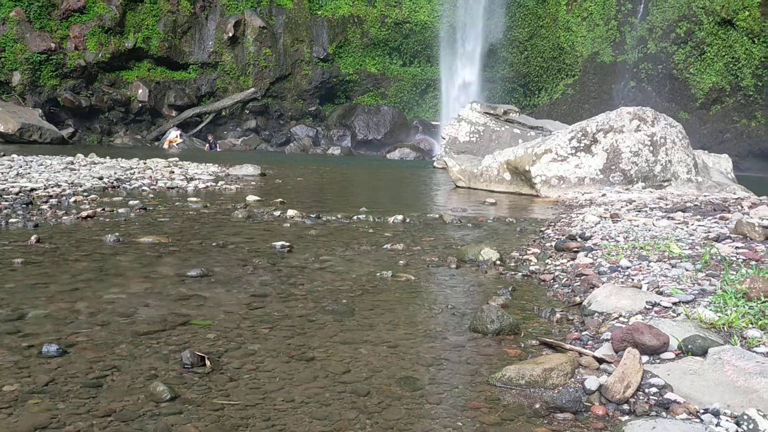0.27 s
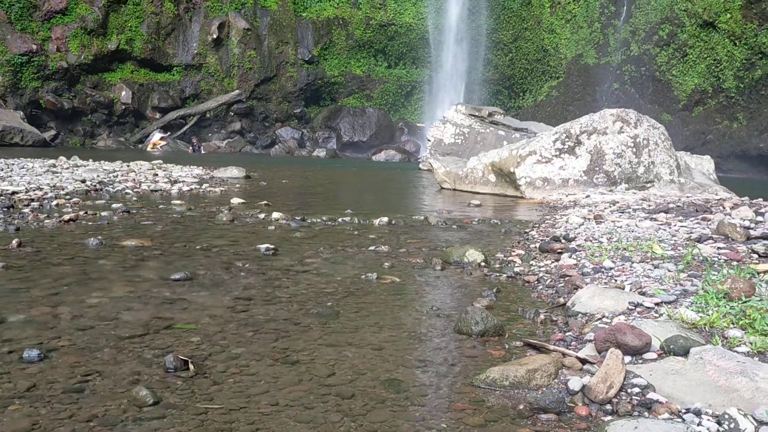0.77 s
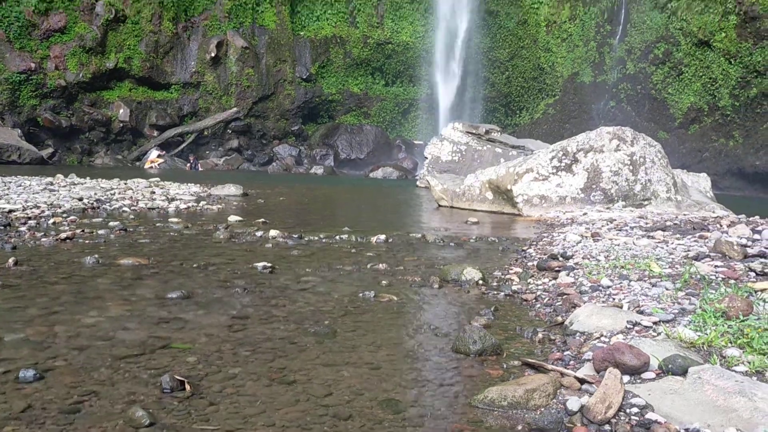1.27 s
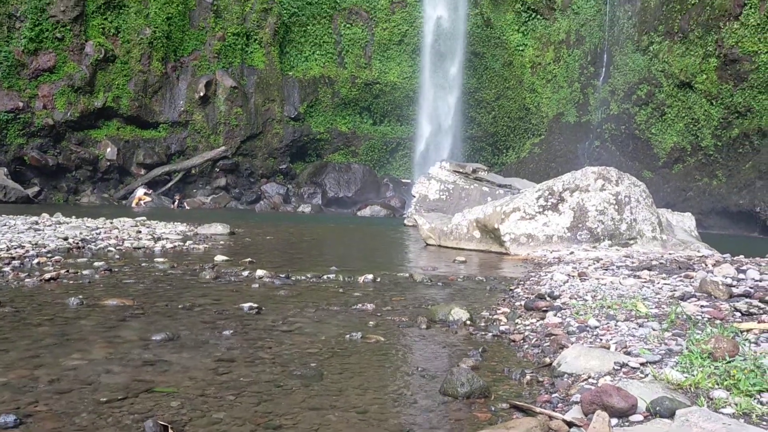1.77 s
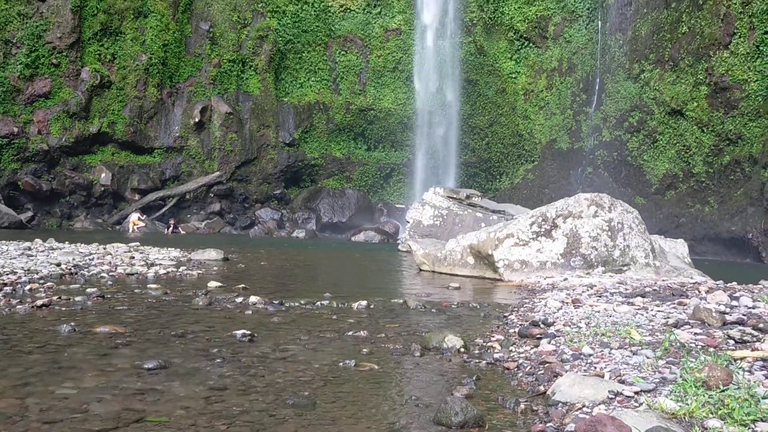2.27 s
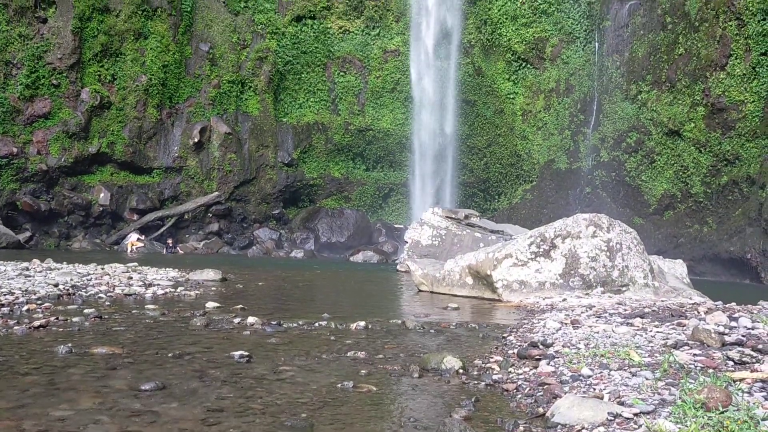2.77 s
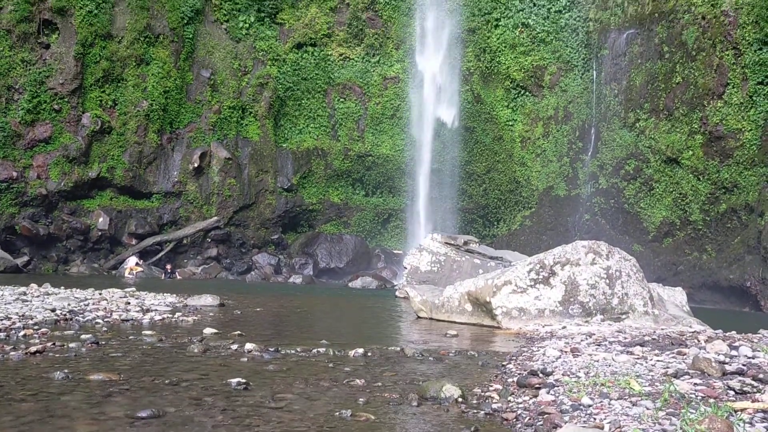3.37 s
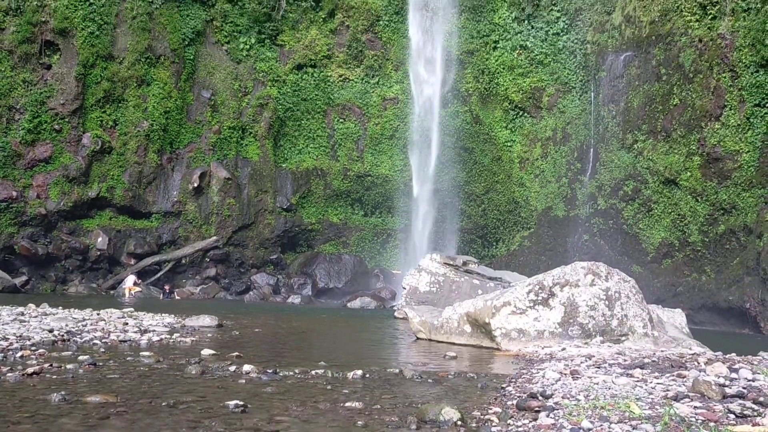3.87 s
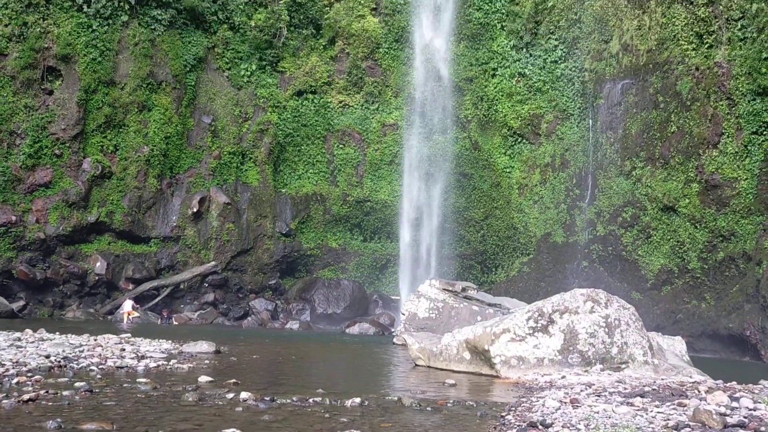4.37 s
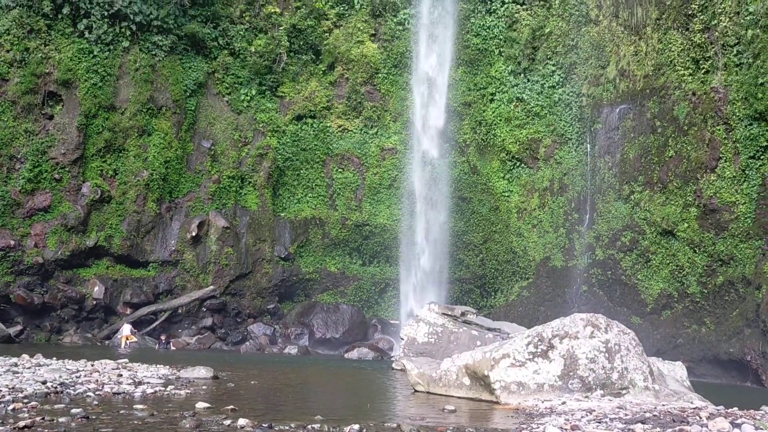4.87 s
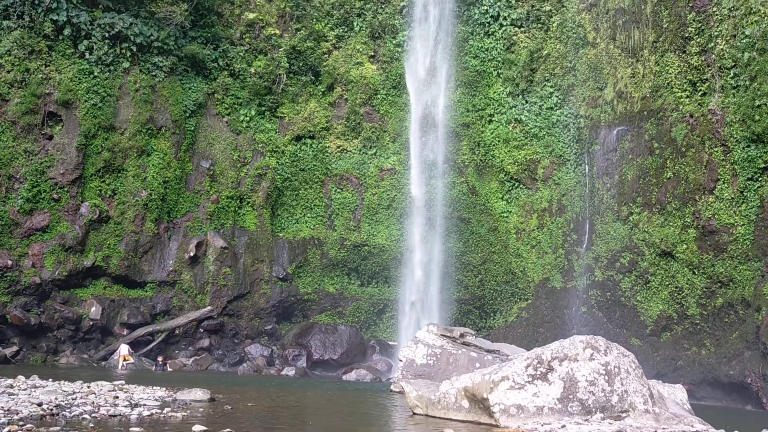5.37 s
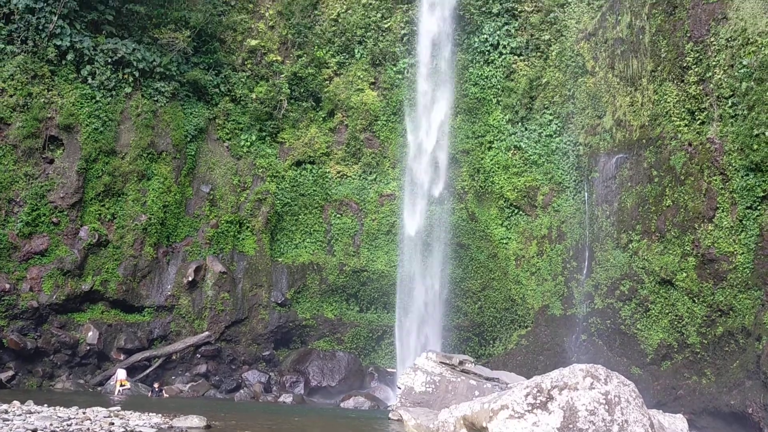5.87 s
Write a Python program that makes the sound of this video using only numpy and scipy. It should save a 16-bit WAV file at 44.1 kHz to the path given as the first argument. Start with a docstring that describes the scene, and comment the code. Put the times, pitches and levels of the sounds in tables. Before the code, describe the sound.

Bright, steady hiss of waterfall spray over a softer rush of water, with faint stream gurgles and occasional close drips.

```python
"""The bright hiss of a tall, thin waterfall fades in, heard from the bank of the shallow stream that
drains its rocky pool. Spray patters in a hiss that peaks near 7.5 kHz, and clumps of water slap the pool
and drive bubbles under. The stream gurgles over stones, a few drops tick close by, and a light breeze
touches the microphone."""
import sys
import numpy as np
from scipy import signal
from scipy.fft import rfft, irfft
from scipy.io import wavfile
from scipy.ndimage import map_coordinates

SR = 44100
rng = np.random.default_rng(int(sys.argv[2]) if len(sys.argv) > 2 else 0)


def unload_wav(signal):
    """Save mono or channel-first audio to the path in sys.argv[1] as 16-bit WAV at rate SR, clipped to [-1, 1]."""
    wavfile.write(
        sys.argv[1],
        SR,
        np.round(np.clip(np.atleast_2d(signal).T, -1, 1) * 32767).astype(np.int16),
    )


N = 269892
TIME = np.arange(N) / SR

# heavy slugs of water landing in the pool: centre_s, length_s, boom_db, roar_lift_db, hiss_lift_db
SLUGS = [(1.08, 0.32, -48.5, -0.5, 0.5), (2.17, 0.21, -47, -0.4, 1), (2.38, 0.26, -61, 2.3, -0.2),
         (2.96, .27, -48, 1, 1.3), (3.4, 0.31, -55, 1.5, 1), (4.02, .22, -45, 1, 2.5),
         (4.6, 0.22, -61.5, 1.0, 1), (5.65, 0.28, -55, 1.2, 1.7)]
ROAR_DB, HISS_DB = -41, -29.5  # levels that the pool's roar and the spray's hiss settle towards


def spray(drops_per_s=2600, drop_spread_db=1.0, drop_db=-1, flutter_db=0.42):
    """Thousands of droplets land each second within a smooth hiss of mist."""
    # spectrum of the spray from the bank: frequency_hz, relative_db
    hiss_spectrum = [(2000, -48.5), (3000, -34), (3700, -23.5), (4500, -16.5), (5500, -10.5), (6500, -5),
                     (7200, -1), (7520, 0.5), (7780, -3.5), (8000, -12), (8250, -18.5), (8450, -30.5),
                     (8650, -58)]
    mist = rng.standard_normal(N)
    patter = undb(drop_db) * impacts(drops_per_s, drop_spread_db)
    flutter = undb(flutter_db * walk(35))
    return colour((mist + patter) * flutter, hiss_spectrum)


def plunge(slaps_per_s=900, slap_spread_db=2.5, slap_db=-2.0, churn_db=1.0):
    """Clumps of water slap the pool over the wash that the cliff throws back; the foam churns."""
    # spectrum of the pool from the bank: frequency_hz, relative_db
    roar_spectrum = [(40, -11), (110, -9), (210, -4), (400, -3.5), (510, -1.5), (620, -3.5), (760, 1.5),
                     (900, -1.5), (1100, -5.5), (1600, -10.5), (2250, -13), (3000, -23.5), (4200, -51.5)]
    wash = rng.standard_normal(N)
    slaps = undb(slap_db) * impacts(slaps_per_s, slap_spread_db)
    churn = undb(churn_db * walk(28))
    return colour((wash + slaps) * churn, roar_spectrum)


def flow(rise_db=6, settle_s=2.08, roar_share=0.79, wander_spread_db=0.63):
    """Levels of roar and hiss in dB: both creep up, wander a little and shift briefly with each slug."""
    shortfall_db = rise_db * np.exp(-TIME / settle_s)
    wander_db = wander_spread_db * walk(4.4)
    roar_db = ROAR_DB - roar_share * shortfall_db + wander_db
    hiss_db = HISS_DB - shortfall_db + wander_db
    for centre_s, length_s, _, roar_lift_db, hiss_lift_db in SLUGS:
        swell = np.hanning(int(length_s * SR))
        add(roar_db, centre_s - length_s / 2, roar_lift_db * swell)
        add(hiss_db, centre_s - length_s / 2, hiss_lift_db * swell)
    return roar_db, hiss_db


def booms(centre_hz=180, edge_ratio=1.4):
    """Each heavy slug drives a cloud of air under, which throbs low and dies away."""
    out = np.zeros(N)
    band = signal.butter(2, [centre_hz / edge_ratio, centre_hz * edge_ratio], "bandpass",
                         fs=SR, output="sos")
    for centre_s, length_s, boom_db, _, _ in SLUGS:
        swell = np.hanning(int(length_s * SR))
        rumble = signal.sosfilt(band, rng.standard_normal(N))
        cloud = unit(rumble[:len(swell)])
        add(out, centre_s - length_s / 2, undb(boom_db) * swell * cloud)
    return out


def near_drops():
    """Drops burst on the stones close to the microphone, each a brief bright tick."""
    # single drops: centre_s, pitch_hz, peak_db, length_ms
    drops = [(1.17, 7200, -17.5, 2.1), (1.579, 7360, -13.5, 2.3), (2.043, 7480, -16.5, 2),
             (2.0688, 4200, -28, 1.3), (3.2727, 4900, -15.5, 1.1), (3.473, 7300, -17, 2.1),
             (4.5655, 7300, -9.5, 2.1), (4.6038, 7250, -17.5, 1.6), (4.8435, 7330, -16, 1.9),
             (6.0, 7200, -13, 2.6)]
    out = np.zeros(N)
    for centre_s, pitch_hz, peak_db, length_ms in drops:
        swell = np.hanning(int(length_ms * SR / 1000) + 2)
        tick = swell * np.sin(2 * np.pi * pitch_hz * np.arange(len(swell)) / SR)
        add(out, centre_s - len(swell) / SR / 2, undb(peak_db) * tick)
    return out


def near_gurgles():
    """Single bubbles ring out of the stream close to the bank."""
    # the clearest gurgles: start_s, pitch_hz, peak_db, ring_cycles
    gurgles = [(.820, 905, -31.5, 14), (2.045, 1140, -30.5, 14), (2.692, 860, -32.5, 75),
               (2.828, 738, -35.5, 67), (2.985, 690, -39.5, 65), (3.300, 844, -31, 16),
               (3.688, 490, -31.5, 16), (3.788, 728, -29, 30), (4.308, 1570, -29.5, 10),
               (4.450, 730, -26, 17), (4.569, 1520, -27.5, 18), (5.202, 966, -28.5, 24),
               (5.220, 900, -28, 25)]
    out = np.zeros(N)
    for start_s, pitch_hz, peak_db, ring_cycles in gurgles:
        add(out, start_s, undb(peak_db) * bubble(pitch_hz, ring_cycles))
    return out


def stream(low_hz=560, high_hz=2300, cycles=20, spread_db=1.5, tilt_db_per_octave=-5, count=1200):
    """Ripples fold over the stones and trap bubbles; the small, high ones are fainter."""
    out = np.zeros(N)
    for when, smallness, weakness, ring in rng.random((count, 4)):
        pitch_hz = low_hz * (high_hz / low_hz) ** smallness
        strength_db = -spread_db * np.log(max(weakness, np.exp(-4)))
        tilt_db = tilt_db_per_octave * np.log2(pitch_hz / low_hz)
        add(out, when * N / SR, undb(strength_db + tilt_db) * bubble(pitch_hz, cycles * (0.5 + ring)))
    return unit(out)


def shallows():
    """Now and then a large bubble plops clear of the rush, and stray droplets tick faintly."""
    plops = lone_bubbles(low_hz=448, high_hz=1003, gain_db=-35.5, cycles=34, count=14)
    drips = lone_bubbles(low_hz=2000, high_hz=4600, gain_db=-36, cycles=9, count=16)
    return plops + drips


def lone_bubbles(low_hz, high_hz, gain_db, cycles, count):
    """A few bubbles at random times and pitches, each ringing for its own length."""
    out = np.zeros(N)
    for when, smallness, ring in rng.random((count, 3)):
        pitch_hz = low_hz * (high_hz / low_hz) ** smallness
        add(out, when * N / SR, undb(gain_db) * bubble(pitch_hz, cycles * (0.5 + ring)))
    return out


def bubble(pitch_hz, cycles, glide=0.13):
    """A trapped air pocket rings down by 40 dB, rising in pitch as it nears the surface."""
    t = np.arange(int(cycles / pitch_hz * SR) + 2) / SR
    age = t * pitch_hz / cycles
    phase = 2 * np.pi * pitch_hz * t * (1 + glide * age / 2)
    return np.sin(phase) * np.exp(-np.log(100) * age)


def breeze(attack_s=0.046, release_s=0.13, calm_db=-67, buffet_db=0.5, gain_db=-2):
    """Eddies at the microphone port rumble unevenly; each gust builds quickly, holds and dies back."""
    # spectrum of wind on the microphone: frequency_hz, relative_db
    wind_spectrum = [(8, -11), (22, -1), (45, -4), (75, -9.5), (140, -19.5), (400, -50.5)]
    # gusts on the microphone: start_s, hold_s, relative_db
    gusts = [(0.917, 1.2, -52.5), (2.79, .25, -57.5), (3.27, .25, -53.5), (3.88, .05, -53),
             (4.28, 1.1, -59), (5.113, 0.76, -49.5), (5.346, 0.078, -44)]
    eddies = rng.standard_normal(N) * undb(buffet_db * walk(14))
    power = undb(calm_db) ** 2
    for start_s, hold_s, relative_db in gusts:
        attack = np.clip((TIME - start_s) / attack_s, 0, 1)
        release = np.exp(-np.maximum(TIME - start_s - hold_s, 0) / release_s)
        power = power + (undb(relative_db) * attack * release) ** 2
    return colour(eddies, wind_spectrum) * np.sqrt(power) * undb(gain_db)


def impacts(per_s, spread_db):
    """Randomly timed blows, most of them small and a few large, at rms 1."""
    struck = rng.random(N) < per_s / SR
    size = np.minimum(rng.exponential(size=N), 5)
    polarity = rng.choice([-1, 1], N)
    return unit(struck * undb(spread_db * size) * polarity)


def walk(points_per_s):
    """A smooth wander through random points, at rms 1."""
    points = rng.standard_normal(4096)
    return unit(map_coordinates(points, [TIME * points_per_s], order=3, mode="wrap"))


def colour(x, spectrum):
    """Shape a sound with rows of frequency_hz, relative_db, and scale it to rms 1."""
    frequency_hz, relative_db = np.transpose(spectrum)
    bins_hz = np.maximum(np.fft.rfftfreq(N, 1 / SR), 1)
    curve_db = np.interp(np.log(bins_hz), np.log(frequency_hz), relative_db)
    return unit(irfft(rfft(x) * undb(curve_db), N))


def add(out, start_s, sound):
    """Mix a short sound in at start_s."""
    start = int(np.clip(start_s * SR, 0, N - 1))
    out[start:start + len(sound)] += sound[:N - start]


def undb(db):
    """Decibels to gain."""
    return 10 ** (np.asarray(db) / 20)


def unit(x):
    """Scale to rms 1."""
    return x / np.sqrt(np.mean(x ** 2))


def scene(stream_db=-10):
    """One microphone on the bank: fall, stream and shallows swell together under the nearer sounds."""
    roar_db, hiss_db = flow()
    pool = (plunge() + undb(stream_db) * stream()) * undb(roar_db)
    pool += shallows() * undb(roar_db - ROAR_DB)
    pool += booms()
    hiss = spray() * undb(hiss_db)
    return (hiss + pool + near_drops() + near_gurgles() + breeze())[None]


def record(dry, open_s=0.11, open_db=-23, fade_s=0.13, top_hz=8500):
    """The recorder opens at low gain, eases up to full and cuts the top steeply."""
    since_open_s = np.maximum(TIME - open_s, 0)
    fade = 1 - (1 - undb(open_db)) * np.exp(-since_open_s / fade_s)
    lowpass = signal.ellip(8, 0.2, 70, top_hz, fs=SR, output="sos")
    return signal.sosfilt(lowpass, dry * fade * (TIME > open_s))


dry = scene()
out = record(dry)
unload_wav(out)
```